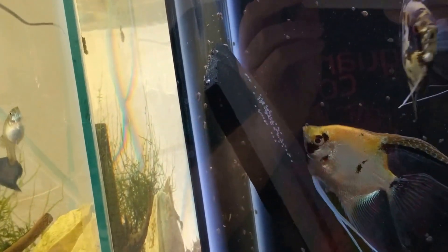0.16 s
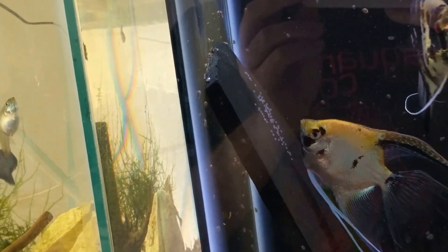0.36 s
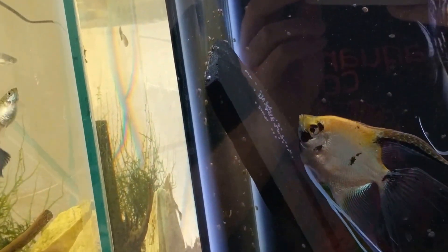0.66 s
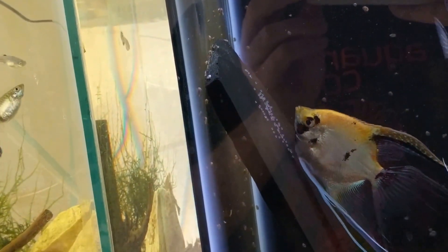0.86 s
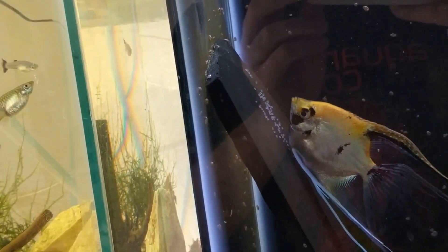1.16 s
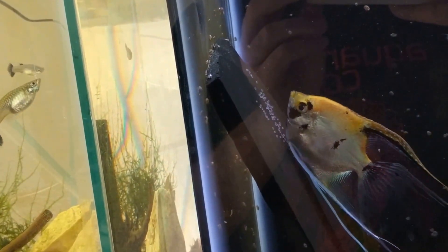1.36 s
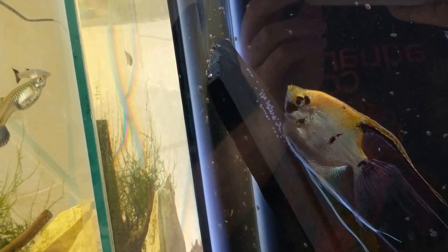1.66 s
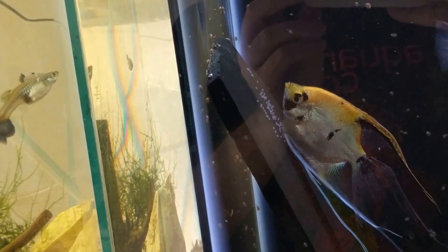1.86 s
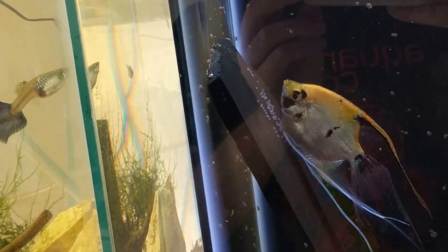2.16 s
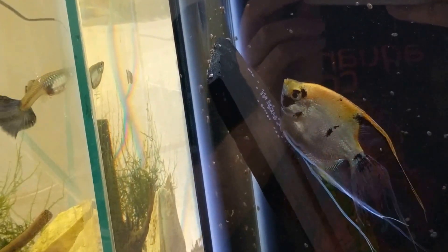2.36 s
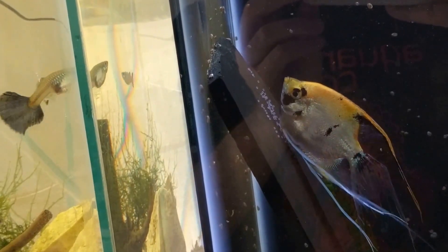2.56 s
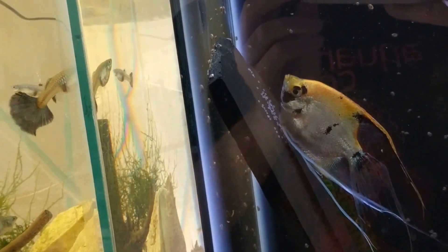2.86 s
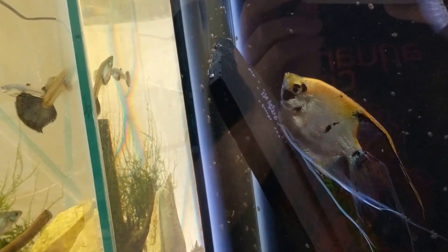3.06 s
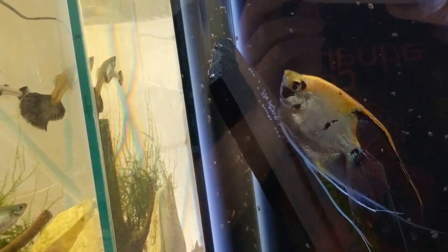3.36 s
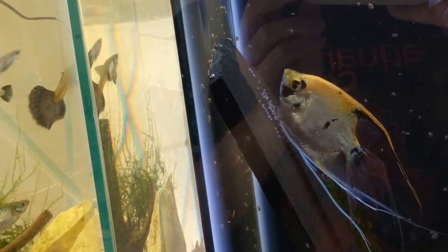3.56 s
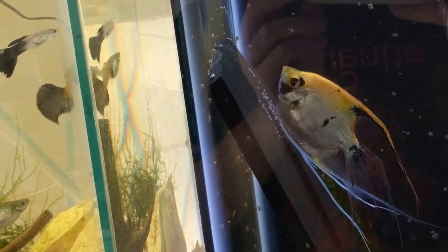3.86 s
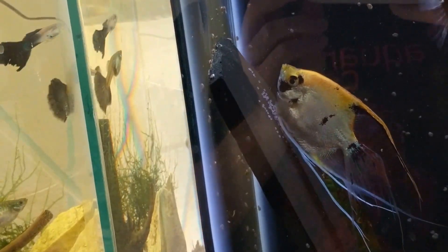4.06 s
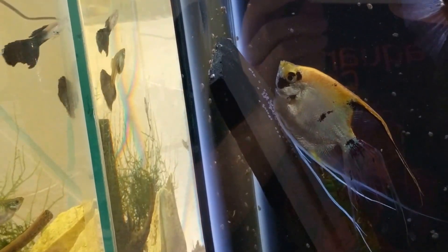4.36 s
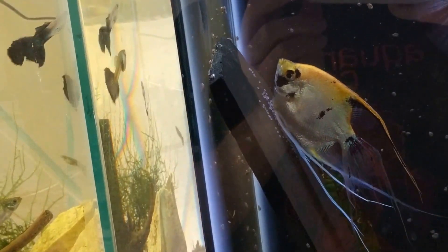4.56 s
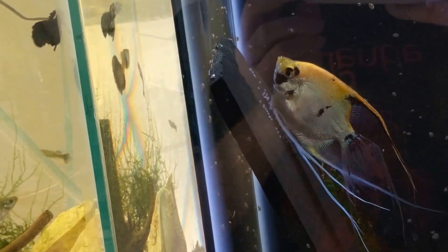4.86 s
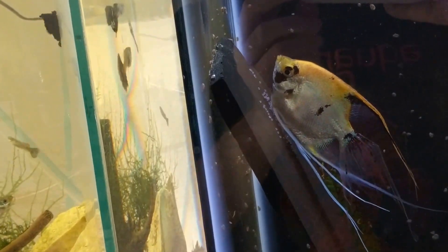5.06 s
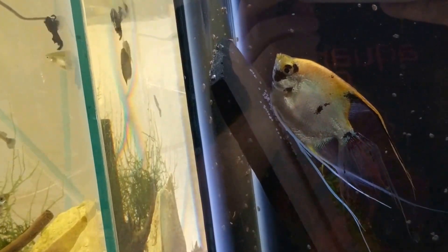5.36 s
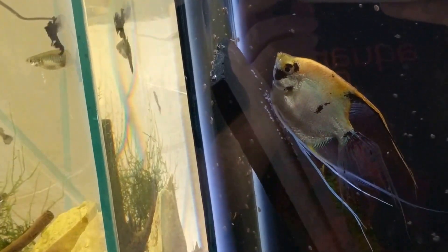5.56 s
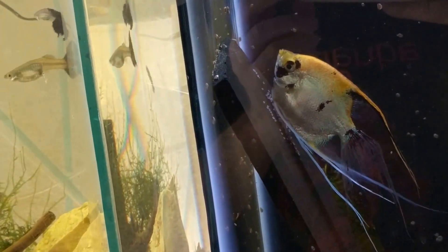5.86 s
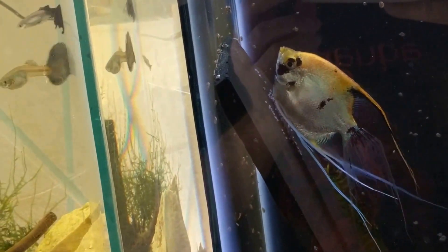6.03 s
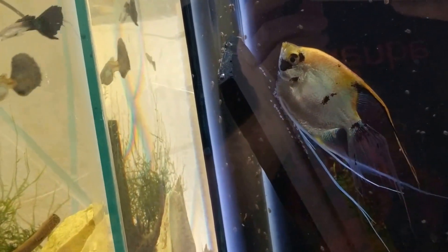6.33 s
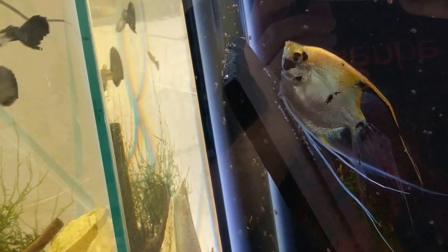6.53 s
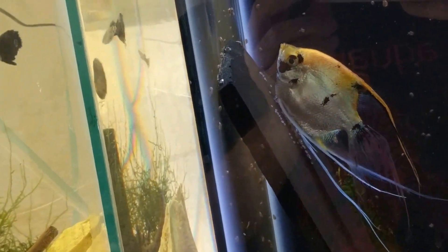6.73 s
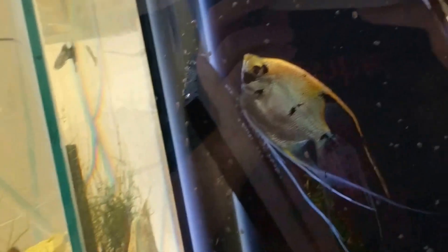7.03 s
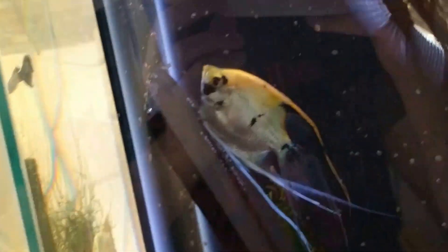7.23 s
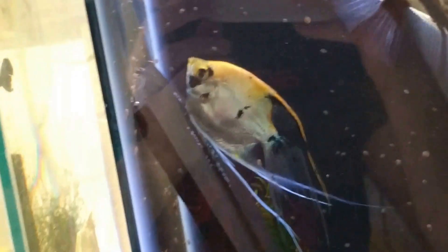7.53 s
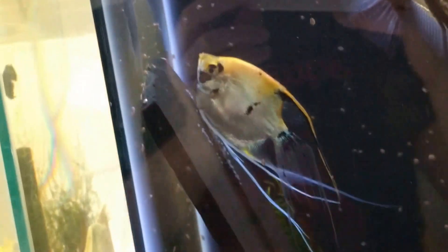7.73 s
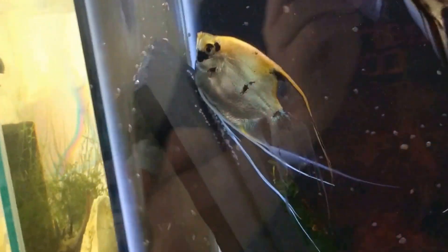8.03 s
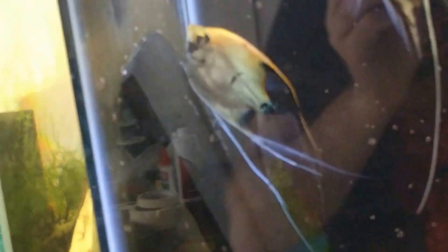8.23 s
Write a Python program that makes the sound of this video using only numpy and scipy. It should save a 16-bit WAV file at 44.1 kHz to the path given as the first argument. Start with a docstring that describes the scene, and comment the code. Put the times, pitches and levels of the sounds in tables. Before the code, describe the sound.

For about eight seconds, aquarium equipment hums in a quiet room. A pump holds a low, steady mains drone, while a lamp ballast adds a thin, high buzz surrounded by soft hiss. Small motors murmur beneath, beating slightly against the hum, over low room air. During the first second or two the buzz shifts subtly as the handheld microphone settles. Very faint, short fizzes of water appear around 0.2, 0.5, 1.7, 3.5 to 4.1, 5.1 and 7.7 seconds. From 5.4 seconds the microphone moves off and the buzz slowly changes colour. A soft, deep bump comes near 6.3. Around 7.2 the hum's upper tones dull and new midrange overtones enter. Meanwhile a far engine rises outside, nearest at about 7.5, its tone sagging briefly in a gear change before fading. Everything is centred and low in level, with the extreme treble cut.

```python
"""Aquarium equipment hums in a quiet room: a pump drones on the mains, a lamp ballast buzzes thinly over soft hiss.
Small motors murmur beside it, and faint bursts of noise fizz in the water now and then.
At first the hand holding the microphone settles; after 5.4 s it moves off, so the reflected buzz changes colour.
A soft low bump follows at 6.3 s, then the hand swings round the tank's corner: the hum dulls, new overtones enter.
Meanwhile an engine far outside passes as a firing tone over rumble, and sags through a gear change."""
import sys
import numpy as np
from scipy import signal
from scipy.fft import rfft, irfft, next_fast_len
from scipy.io import wavfile

SR = 44100
rng = np.random.default_rng(int(sys.argv[2]) if len(sys.argv) > 2 else 0)


def generate_wav(sig):
    """Save sig (samples, or channels by samples) to the path in sys.argv[1] as 16-bit PCM at SR."""
    pcm = np.round(np.clip(np.atleast_2d(sig).T, -1, 1) * 32767).astype(np.int16)
    wavfile.write(sys.argv[1], SR, pcm)


N = 369999
T = np.arange(N) / SR   # time [s]
MAINS_HZ = 60.029
CUTOFF_HZ = 15750   # top of the buzz and of the whole sound
SOUND_M_PER_S = 343


def from_db(db):
    """Decibels to gain."""
    return 10 ** (np.asarray(db) / 20)


def rms_one(x):
    """Scale to unit power."""
    return x / np.sqrt(np.mean(x ** 2) + 1e-20)


def at_hz(points, hz):
    """Read a spectrum's level in dB on a log-frequency axis."""
    known_hz, level_db = np.transpose(points)
    return np.interp(np.log(hz + 1e-9), np.log(known_hz), level_db)


def noise(spectrum):
    """Steady noise: white noise shaped to the given dB per Hz."""
    size = next_fast_len(N)
    density_db = at_hz(spectrum, np.fft.rfftfreq(size, 1 / SR))
    gain = from_db(density_db) * np.sqrt(SR / 2)   # white noise spreads its power over SR / 2
    white = rng.standard_normal(size)
    return irfft(rfft(white) * gain, size)[:N]


def drift(rate):
    """Slow random wander: straight lines between random points of spread 1, rate points a second."""
    knots = rng.standard_normal(1024)
    return np.interp(T * rate, np.arange(len(knots)), knots)


def tone(turns):
    """A sine of unit power along a phase in turns, from a random start."""
    return np.sqrt(2) * np.sin(2 * np.pi * (turns + rng.random()))


def swell(s, length):
    """A bell of height 1 around a moment, down to 1/e at length seconds on either side."""
    return np.exp(-np.minimum(((T - s) / length) ** 2, 20))


# the hand settles, rests, then moves off at an even speed and swings round the tank's corner
SETTLE_M, SETTLE_S, START_ROUND_CORNER = .035, 1.0, .42   # distance to go, time constant, share 0-1
LEAVE_S, LEAVE_M_PER_S = 5.44, .0444
CORNER_S, CORNER_SWING_S = 7.2, .2   # halfway round; time scale of the swing


def hand():
    """Microphone's distance from its resting place [m] and share of the way round the tank's corner (0-1)."""
    unsettled = np.exp(-T / SETTLE_S)
    moved = SETTLE_M * unsettled + LEAVE_M_PER_S * np.maximum(T - LEAVE_S, 0)
    swing = .5 + .5 * np.tanh((T - CORNER_S) / CORNER_SWING_S)
    return moved, np.clip(START_ROUND_CORNER * unsettled + swing, 0, 1)


# strong partials of the hum, before waver and shade: (multiple of the mains [-], level [dB rms])
HUM_PARTIALS = [(1, -59.5), (2, -54.5), (3, -65), (4, -73), (5, -65), (6, -85), (7, -75), (8, -61),
                (9, -70.5), (13, -77), (14, -73), (18, -78.5), (21, -81.5), (22, -81.5), (23, -70.5),
                (24, -80.5), (28, -80.5), (30, -81.5), (33, -78), (37, -81), (44, -76), (60, -79),
                (70, -79), (83, -77), (110, -74.5), (116, -71.5), (121, -68.5), (126, -71.5), (136, -73.5),
                (158, -83), (177, -90.5)]


def pump(waver_db, shade_db, shade_hz):
    """The mains shakes pump and housing; upper partials waver more, and fall into shade round the corner."""
    _, round_corner = hand()
    mains_turns = MAINS_HZ * T
    hum = 0
    for multiple, level_db in HUM_PARTIALS:
        waver = waver_db * np.log(1 + multiple) * drift(rate=2.5)
        # long waves bend round the tank, short ones are shaded
        shaded = 1 / (1 + (shade_hz / (multiple * MAINS_HZ)) ** 2)
        shade = shade_db * shaded * round_corner ** 2
        hum = hum + from_db(level_db + waver + shade) * tone(round(multiple) * mains_turns)
    return hum


# the ballast's dense overtones, level of each: (frequency [Hz], level [dB rms])
BUZZ_OVERTONES = [(600, -83), (1000, -86), (1500, -88.5), (2800, -87), (4100, -87.5), (5100, -82.5),
                  (6100, -79.5), (6500, -76), (7400, -76.5), (8400, -81), (9000, -90.5), (11200, -94),
                  (12200, -102), (15500, -106)]
# overtones that come in round the corner, level of each once fully round: (frequency [Hz], level [dB rms])
CORNER_OVERTONES = [(600, -85), (1100, -79), (1600, -103), (2000, -89), (2200, -71.5), (2450, -83.5),
                    (2800, -82), (3100, -79.5), (3400, -95), (3800, -84), (4500, -100), (15000, -125)]


def ballast(overtones, echo_db, count=4, size=8192):
    """One buzz per mains cycle comes directly and by reflections, whose lengths change as the hand moves."""
    moved, _ = hand()
    overtones_hz = MAINS_HZ * np.arange(int(CUTOFF_HZ / MAINS_HZ))
    heights = from_db(at_hz(overtones, overtones_hz))
    heights = heights * (overtones_hz > overtones[0][0])   # nothing below the table's first frequency
    heights[[round(multiple) for multiple, _ in HUM_PARTIALS]] = 0   # these ring in the hum

    gains = from_db([0] + [echo_db] * (count - 1))
    gains = gains / np.linalg.norm(gains)
    facings = np.linspace(1, -1, count)   # how much each path shortens per metre moved
    buzz = 0
    for gain, facing in zip(gains, facings):
        # ringing in the housing smears each pulse over the whole cycle: random phases
        phases = np.exp(2j * np.pi * rng.random(len(heights)))
        cycle = irfft(heights * phases, size) * size / np.sqrt(2)
        source_time = T + facing * moved / SOUND_M_PER_S   # a shorter path is heard earlier
        buzz = buzz + gain * np.interp(MAINS_HZ * source_time % 1, np.arange(size) / size, cycle)
    return buzz


# motors that turn out of step with the mains: (frequency [Hz], level [dB rms])
MOTOR_TONES = [(39.7, -73.5), (58.8, -67.5), (159.3, -71.5), (198.6, -80), (201.4, -81.5), (230.2, -72.5),
               (238.8, -80.5), (262.1, -77.5)]


def motors(slip_turns):
    """Free-running motors slip a little in phase and beat against the hum."""
    murmur = 0
    for hz, level_db in MOTOR_TONES:
        murmur = murmur + from_db(level_db) * tone(hz * T + slip_turns * drift(rate=1.5))
    return murmur


# hiss around the buzz, before its flutter: (frequency [Hz], density [dB per Hz])
HISS_SPECTRUM = [(2500, -125), (4400, -106), (5500, -99.7), (6200, -99), (6550, -93.5), (7150, -94.5),
                 (8100, -100.3), (9000, -105.5), (12200, -112.5), (15300, -113.1)]


def hiss(flutter_db):
    """Soft noise shaped around the buzz, its level fluttering slightly."""
    return noise(HISS_SPECTRUM) * from_db(flutter_db * drift(rate=7.7))


# fizzes of the water, level at the peak: (time [s], centre [Hz], width [octaves], level [dB rms])
WATER_FIZZES = [(0.222, 9500, .4, -65), (0.55, 1700, .65, -68), (1.66, 5160, .15, -65),
                (1.70, 1390, 0.44, -67), (3.47, 4850, .08, -68), (3.738, 2130, .3, -68.5),
                (4.135, 14200, .3, -72), (5.125, 7050, 0.13, -57), (7.692, 10500, .25, -67)]
FIZZ_S = .045   # half the length of a fizz


def fizzes():
    """Each fizz is a soft, brief swell of noise in a band of its own."""
    fizzing = 0
    for s, hz, octaves, level_db in WATER_FIZZES:
        edges = hz * 2 ** (np.array([-.5, .5]) * octaves)
        edges = np.minimum(edges, SR / 2 - np.array([2, 1]))
        band_pass = signal.butter(2, edges, "band", fs=SR, output="sos")
        band = signal.sosfilt(band_pass, rng.standard_normal(N))
        fizzing = fizzing + from_db(level_db) * rms_one(band) * swell(s, FIZZ_S) ** 2
    return fizzing


# shape of the engine's rumble through the walls: (frequency [Hz], relative density [dB per Hz])
RUMBLE_SHAPE = [(30, -25), (50, 2.5), (70, -7), (105, -14), (190, -6.5), (300, -26), (1000, -57)]
# the far engine passes once and changes gear on the way
NEAREST_S, PASS_S = 7.45, .98   # closest moment; time to fade by 9 dB on either side
FIRING_HZ, FIRING_DB, RUMBLE_DB = 88.2, -63, -63.5   # under load, with nothing lost to distance
GEAR_CHANGE_S, CLUTCH_S = 7.55, .19   # slackest moment; half the time off load
SAG_HZ, SLACK_TONE_DB, SLACK_RUMBLE_DB = 24, -4.5, 2   # fall in pitch and level shifts off load


def far_engine(third_db, rough):
    """Firing tone and low rumble pass the walls; off load the tone sags and a third harmonic joins."""
    near, slack = swell(NEAREST_S, PASS_S), swell(GEAR_CHANGE_S, CLUTCH_S)
    turns = np.cumsum(FIRING_HZ - SAG_HZ * slack) / SR
    exhaust = tone(turns) + from_db(third_db) * slack * tone(3 * turns)
    shudder = 1 + rough * drift(rate=14)
    firing = from_db(FIRING_DB + SLACK_TONE_DB * slack) * exhaust * shudder
    rumble = from_db(RUMBLE_DB + SLACK_RUMBLE_DB * slack) * rms_one(noise(RUMBLE_SHAPE))
    return near * (firing + rumble)


# one soft, low bump as the engine draws near
BUMP_S, BUMP_HALF_S, BUMP_HZ, BUMP_DB = 6.26, .05, 52, -60   # level at the peak [dB rms]


def bump():
    """A few cycles of deep bass swell and die away."""
    return from_db(BUMP_DB) * swell(BUMP_S, BUMP_HALF_S) * tone(BUMP_HZ * T)


# air of the room, before its flutter: (frequency [Hz], density [dB per Hz])
ROOM_SPECTRUM = [(32, -101), (47, -85), (68, -91.5), (85, -86.5), (100, -92.5), (210, -92.5), (320, -89.5),
                 (520, -90.5), (720, -97.5), (820, -92.5), (1150, -99.2), (1600, -99.5), (3600, -105.5),
                 (7000, -125)]


def room_air(flutter_db):
    """Low, steady noise of the room's air, its level fluttering slightly."""
    return noise(ROOM_SPECTRUM) * from_db(flutter_db * drift(rate=7.8))


def scene():
    """Equipment, hiss, water, far engine, bump and room air, all heard in the centre."""
    _, round_corner = hand()
    hum = pump(waver_db=.31, shade_db=-4.0, shade_hz=1100)
    buzz = ballast(BUZZ_OVERTONES, echo_db=-6.5)
    corner_buzz = round_corner * ballast(CORNER_OVERTONES, echo_db=-5.0)
    equipment = hum + buzz + corner_buzz + motors(slip_turns=.04)
    events = fizzes() + far_engine(third_db=-5.0, rough=.39) + bump()
    centre = equipment + hiss(flutter_db=.43) + events + room_air(flutter_db=.43)
    return np.array([centre, centre])


def record(dry):
    """A steep low-pass filter cuts the top treble."""
    low_pass = signal.ellip(12, .1, 70, CUTOFF_HZ, fs=SR, output="sos")
    return signal.sosfilt(low_pass, dry)


dry = scene()
out = record(dry)
generate_wav(out)
```